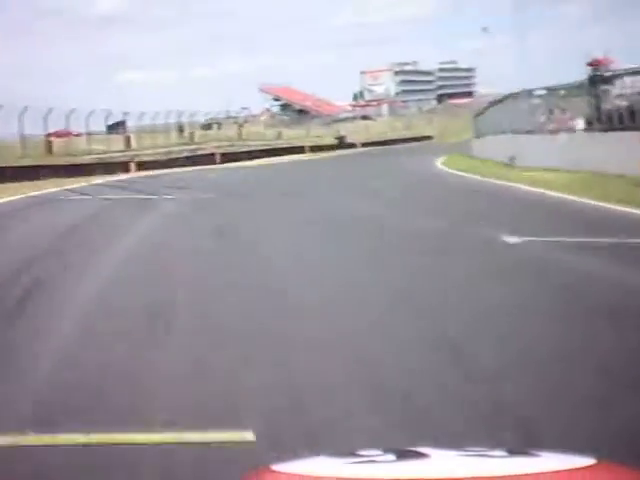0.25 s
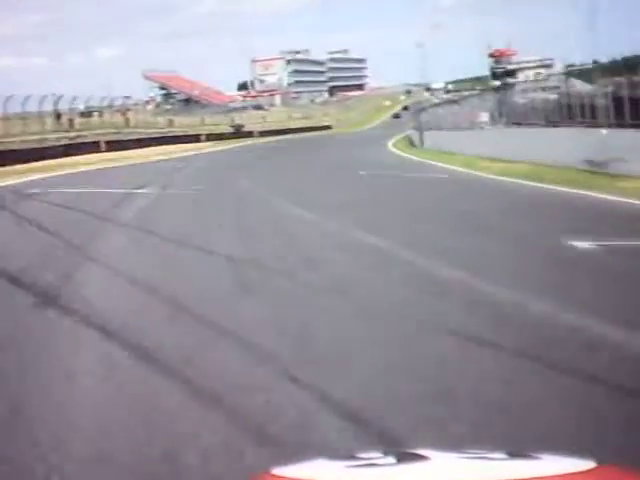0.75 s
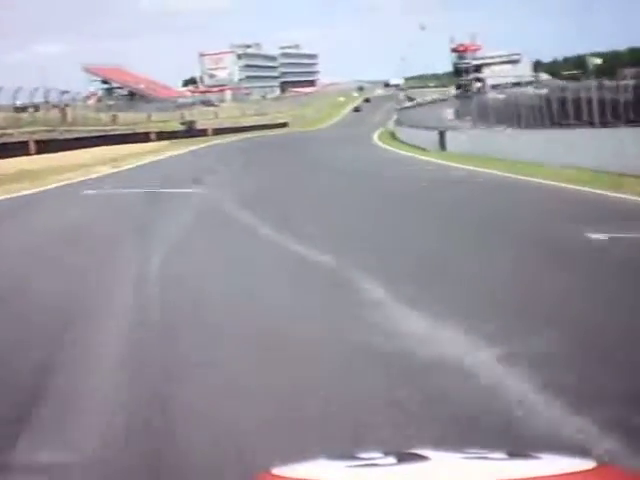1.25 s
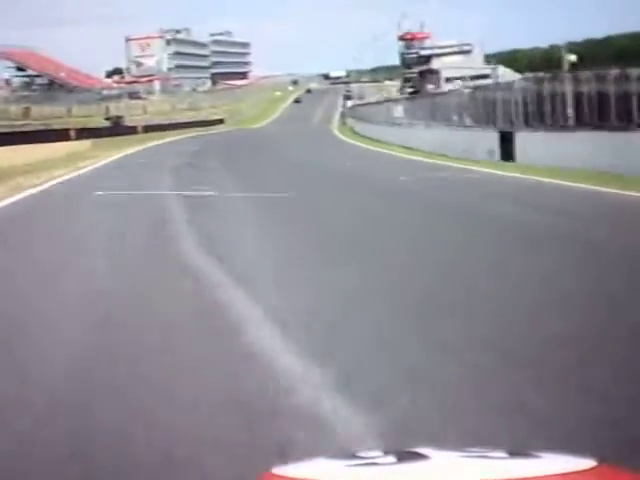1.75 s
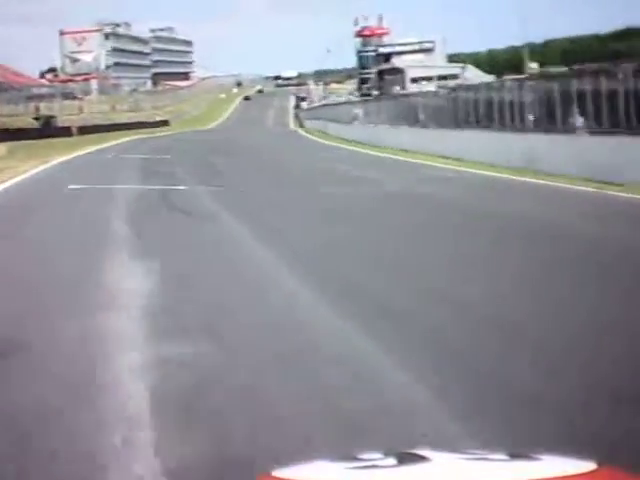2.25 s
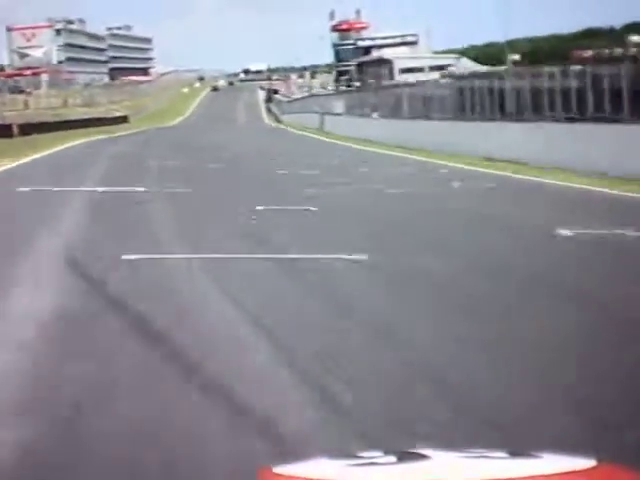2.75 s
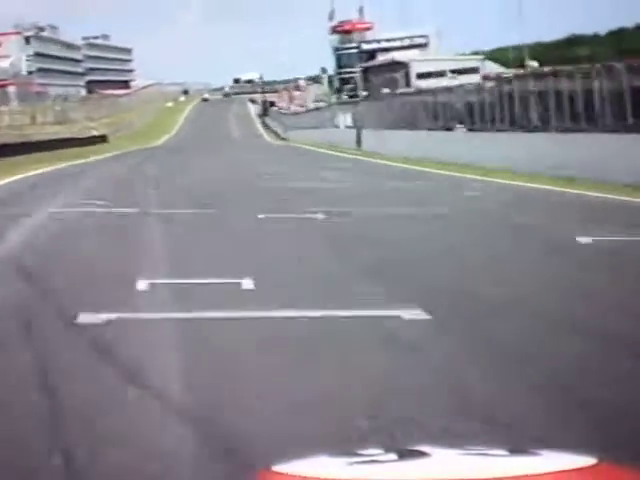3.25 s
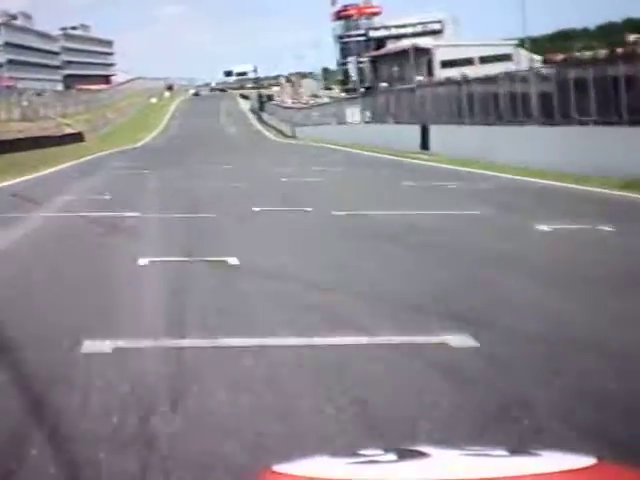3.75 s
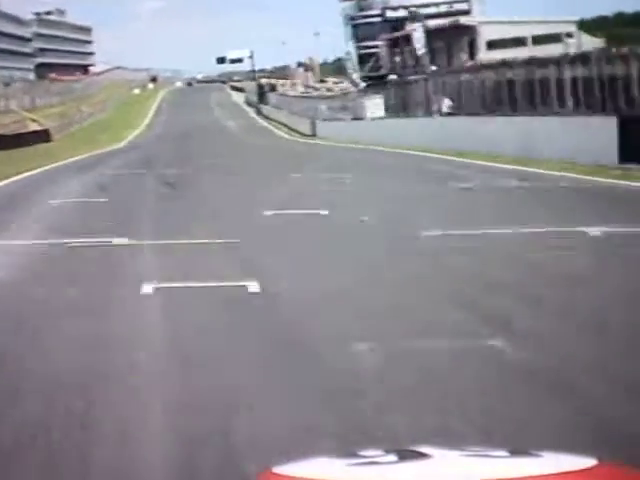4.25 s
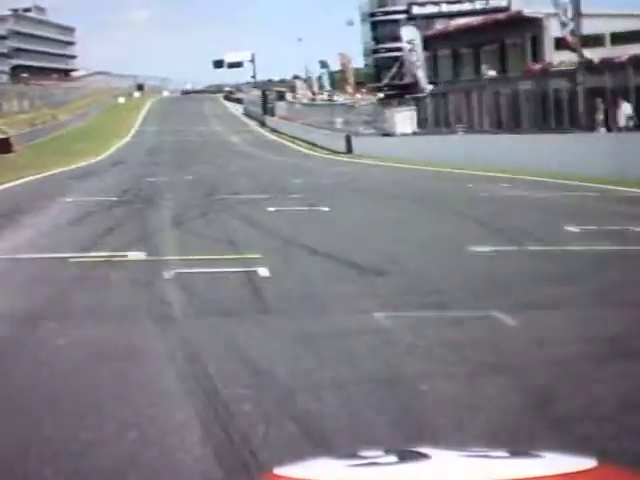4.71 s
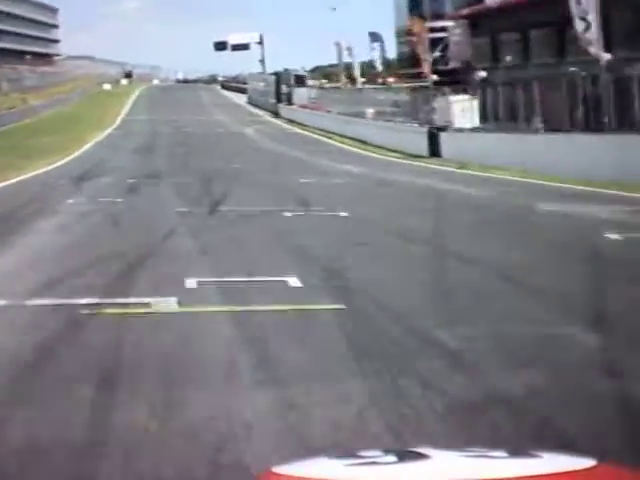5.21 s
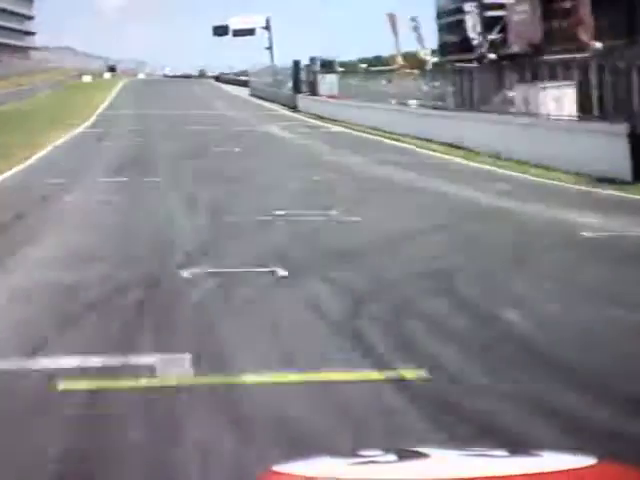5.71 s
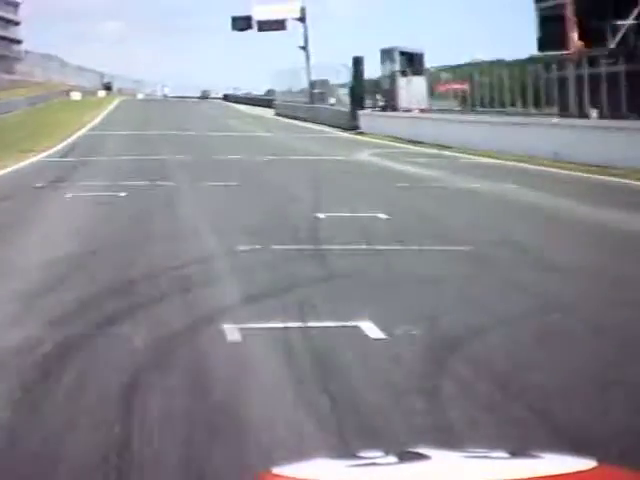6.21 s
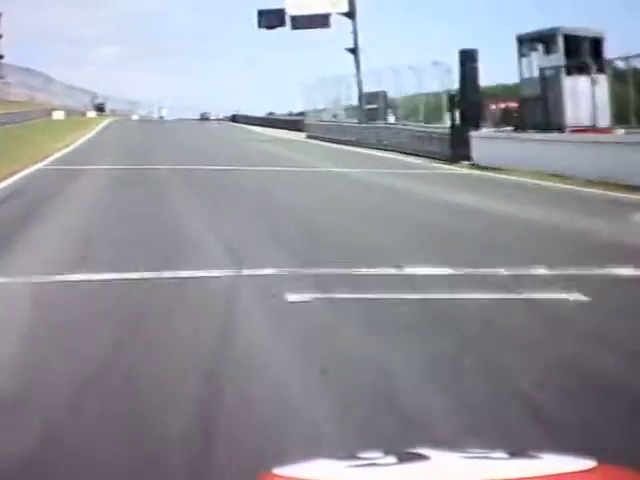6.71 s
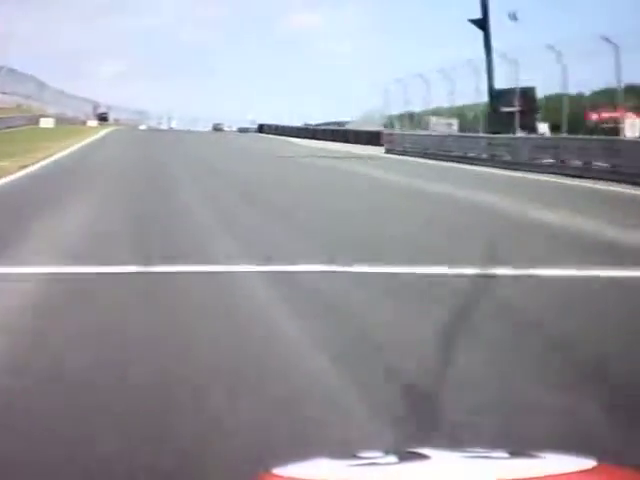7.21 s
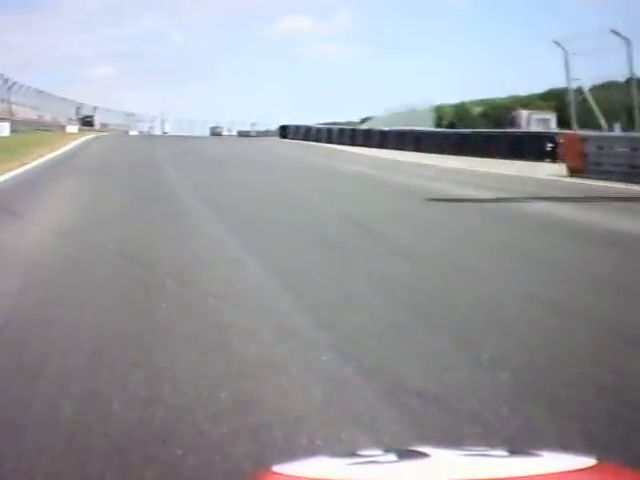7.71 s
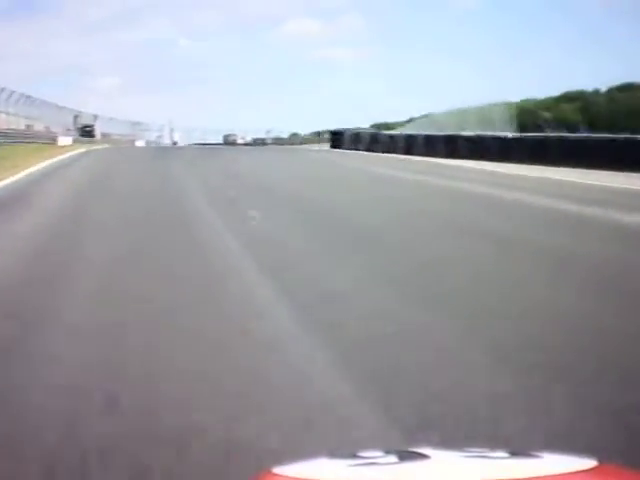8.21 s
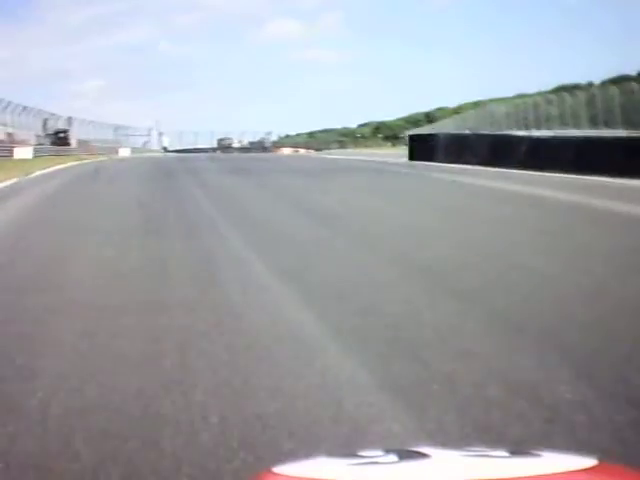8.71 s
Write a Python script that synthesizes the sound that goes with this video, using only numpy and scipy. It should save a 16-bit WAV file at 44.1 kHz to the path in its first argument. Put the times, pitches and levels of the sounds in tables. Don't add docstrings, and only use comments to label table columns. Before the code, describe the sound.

Distorted onboard roar of a four-cylinder racing engine and buffeting wind, rising steadily, choked into sputtering fragments at top speed before a late lift.

```python
import sys
import numpy as np
from scipy import signal
from scipy.fft import rfft, irfft, next_fast_len
from scipy.io import wavfile
from scipy.ndimage import uniform_filter1d

SR = 44100
rng = np.random.default_rng(int(sys.argv[2]) if len(sys.argv) > 2 else 0)


def to_wav(sig):
    pcm = np.clip(np.atleast_2d(sig), -1, 1) * 32767
    pcm = np.round(pcm).astype(np.int16)
    wavfile.write(sys.argv[1], SR, pcm.T)


def amplitude_ratio(level_db):
    exponent = np.asarray(level_db, float) / 20
    return 10 ** exponent


N = 395136
TIME = np.arange(N) / SR

# time_s, four_stroke_cycle_hz
ENGINE_SPEED = [(0.0, 37.7), (0.5, 38.03), (1.0, 38.6), (1.5, 39.05), (1.75, 39.48), (2.25, 40.0),
                (2.75, 40.82), (3.25, 41.42), (3.5, 41.92), (4.0, 42.4), (4.5, 43.02), (5.25, 43.87),
                (6.0, 44.53), (7.0, 45.2), (7.6, 45.43), (8.0, 44.6), (8.3, 43.9), (8.96, 41.46)]
# cycle_multiple, level_db away from mount resonances, change_db once lifted
ENGINE_TONES = [
    (2, -19, -4),
    (4, -24, 3),
    (8, -18, 0),
    (12, -30, -4),
    (16, -27, 0),
    (18, -31, -2),
    (36, -23, -16),
    (54, -34, -6),
    (72, -31, -8),
]
# cycle_multiple, level_db
WEAK_ORDERS = [(5, -23.5), (7, -23.5), (9, -21), (10, -34), (15, -28), (22, -29), (24, -31), (35, -29.5),
               (37, -34)]
# center_hz, width_hz, peak_db
MOUNT_RESONANCES = [(75.3, 1.8, -2), (80, 5, -10), (171, 17, -8), (320, 11, -2), (343, 10, -7),
                    (524, 30, -14), (638, 26, -14.5), (742, 30, -17), (1393, 36, -6.5), (1484, 36, -5.5),
                    (1550, 140, -14), (2080, 110, -22), (2200, 40, -17), (3000, 40, -15)]
# center_hz, width_hz, peak_db
CHASSIS_RESONANCES = [(75.3, 15, 5), (221, 20, -2), (320, 21, 1.5), (342, 36, -1.5), (543, 32, -12.5),
                      (620, 110, -10), (1400, 340, -8.5)]
# frequency_hz, density_db (per Hz)
ROAR_SPECTRUM = [(20, -19), (50, -7), (120, -4), (300, -1), (600, -5), (1200, -6), (2000, -12), (3000, -17),
                 (4500, -22)]
# time_s, let_through_db
OPENNESS = [(0.0, -13.5), (0.32, -14.3), (0.64, -13.2), (1.2, -12.5), (1.47, -12.8), (1.72, -10.1),
            (2.6, -11), (3.4, -11.6), (4.45, -12.9), (4.66, -15.3), (5.15, -16.6), (5.62, -15),
            (6.0, -16.8), (7.15, -19.4), (7.4, -16.6), (8.17, -16), (8.6, -12.3), (8.96, -13.0)]
# start_s, length_ms, let_through_db
LONG_GUSTS = [(4.874, 23.2, -26), (4.903, 39, -35.5), (4.964, 20, -35.5), (5.766, 12, -45),
              (5.842, 11.0, -34), (5.916, 20.5, -23), (6.056, 34, -22), (6.262, 24, -26), (6.299, 25, -32),
              (6.369, 31.8, -42), (6.404, 44.3, -36), (6.558, 21, -34), (6.586, 16.2, -23),
              (6.615, 66, -50), (6.693, 29, -27.8), (6.735, 47.4, -38), (6.789, 52, -51), (6.853, 73, -46),
              (6.936, 26.1, -25.5), (6.972, 54, -50), (7.057, 20.5, -19.5), (7.097, 24.7, -23),
              (7.141, 23.8, -29.7), (7.17, 48, -36), (7.23, 39.7, -47), (7.471, 12.8, -27.5),
              (7.498, 10.7, -28), (7.638, 22, -25), (7.716, 24.4, -18), (8.084, 17, -33)]


def unit(x):
    return x / np.sqrt(np.mean(x ** 2))


def shaped(gain):
    size = next_fast_len(N)
    hz = np.arange(1, size // 2 + 2) * SR / size
    spectrum = rfft(rng.standard_normal(size)) * gain(hz)
    return unit(irfft(spectrum, size)[:N])


def walk(rate_hz):
    hold = int(SR / rate_hz)
    steps = np.repeat(rng.standard_normal(N // hold + 1), hold)
    return unit(uniform_filter1d(uniform_filter1d(steps, hold), hold)[:N])


def engine():
    cycle_hz = uniform_filter1d(np.interp(TIME, *np.transpose(ENGINE_SPEED)), size=4000)
    phase = 2 * np.pi * np.cumsum(cycle_hz) / SR + .002 * walk(25)
    lift_s, lift_over_s = 7.6, .2
    lifted = np.clip((TIME - lift_s) / lift_over_s, 0, 1)

    def tone(multiple, level_db, flicker_db):
        level = amplitude_ratio(level_db + flicker_db * walk(16))
        return level * np.sqrt(2) * np.sin(multiple * phase + rng.uniform(0, 2 * np.pi))

    def along(response, multiple):
        return response(multiple * cycle_hz[::64]).repeat(64)[:N]

    strong = []
    for multiple, level_db, change_db in ENGINE_TONES:
        k = int(multiple)
        swell = np.sqrt(amplitude_ratio(level_db) ** 2 + along(mount, k))
        strong.append(tone(k, change_db * lifted + walk(40), 1.8) * swell)
    weak = sum(tone(k, db, 3.4) * (along(chassis, k) + .2) for k, db in WEAK_ORDERS)
    firing, teeth = sum(strong[:5]), sum(strong[5:])
    return amplitude_ratio(1.5) * firing + amplitude_ratio(2) * teeth + amplitude_ratio(9.5) * weak


def mount(hz):
    return sum(amplitude_ratio(db) ** 2 / (1 + (2 * (hz - f) / w) ** 4) for f, w, db in MOUNT_RESONANCES)


def chassis(hz):
    return np.sqrt(sum(amplitude_ratio(db) ** 2 / (1 + (2 * (hz - f) / w) ** 2) for f, w, db in CHASSIS_RESONANCES))


def roar():
    hz, db = np.transpose(ROAR_SPECTRUM)
    wind = shaped(lambda f: amplitude_ratio(np.interp(np.log(f), np.log(hz), db))) * amplitude_ratio(1.2 * walk(30))
    frame = shaped(chassis) * amplitude_ratio(-4) * amplitude_ratio(2 * walk(8))
    return amplitude_ratio(-1.5) * (wind + frame)


def flutters(count=48):
    from_s, to_s = 4.66, 8.23
    when, length, level = rng.random((count, 3)).T
    start_s = from_s + (to_s - from_s) * (np.arange(count) + when) / count
    length_ms = np.interp(length ** 2, (0, 1), (3, 9))
    let_db = np.interp(level, (0, 1), (-34, -14))
    return list(zip(start_s, length_ms, let_db))


def pressure(let_db):
    free_db = -8.5
    lost_db, held = free_db - let_db, np.zeros(N)
    for start_s, length_ms, gust_db in [*flutters(), *LONG_GUSTS]:
        a, b = int(start_s * SR), int((start_s + length_ms / 1000) * SR)
        lost_db[a:b] = free_db - gust_db + 6
        held[a:b] = 1
    push = 0.54 * np.sqrt(np.clip(uniform_filter1d(lost_db, size=120), 0, None))
    spring = 1.2 * uniform_filter1d(held, size=5000) * uniform_filter1d(1 - held, size=150)
    unsteady = np.clip(1 + .11 * walk(60) + .2 * walk(250), 0, None)
    return push * unsteady, spring


def diaphragm(sound, push):
    knee, far_side, flex, flex_hz = .14, 1.15, .13, 1100

    def past(x):
        return knee * np.logaddexp(0, x / knee)

    stiffness = 1 + .8 * push
    travel = 2.8 / stiffness
    outward = travel * np.tanh(past(sound - push) / travel)
    inward = past(-sound - far_side * push)
    bass = signal.sosfilt(signal.butter(N=1, Wn=flex_hz, fs=SR, output="sos"), sound)
    return outward - inward + flex / stiffness * bass


def scene():
    let_db = np.interp(TIME, *np.transpose(OPENNESS))
    push, spring = pressure(let_db)
    return diaphragm(engine() + roar() + spring, push)[None]


def low_pass(x):
    return signal.sosfilt(signal.butter(12, 15900, fs=SR, output="sos"), x)


def record(dry):
    coupling = signal.butter(N=1, Wn=62, btype="high", fs=SR, output="sos")
    coupled = signal.sosfilt(coupling, amplitude_ratio(-2.8) * dry)
    chatter_hz, chatter_at = 3700, .26
    fall = uniform_filter1d(np.clip(-coupled - chatter_at, 0, .1) * 10, size=40)
    ring = .4 + np.sin(2 * np.pi * np.cumsum(chatter_hz * (1 + .13 * walk(200))) / SR)
    seldom = np.clip(walk(450) - .3, 0, .5)
    chatter = amplitude_ratio(-1.5) * fall * seldom * ring
    ceiling, hard_clip = .685, .7
    preamp = ceiling * np.tanh(coupled / ceiling)
    voice_band = signal.butter(N=6, Wn=3780, fs=SR, output="sos")
    narrow = signal.sosfiltfilt(voice_band, preamp + chatter)
    narrow = signal.sosfilt(signal.cheby2(N=14, rs=70, Wn=5050, fs=SR, output="sos"), narrow)
    mix = np.clip(narrow, -hard_clip, hard_clip) - .006
    return low_pass(mix)


dry = scene()
out = record(dry)
to_wav(out)
```